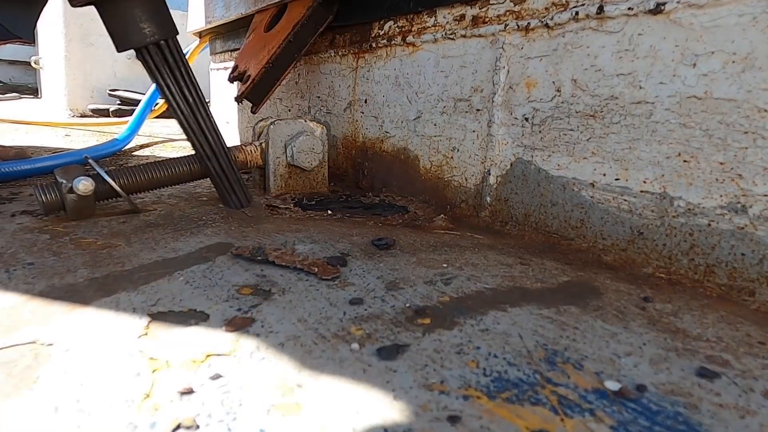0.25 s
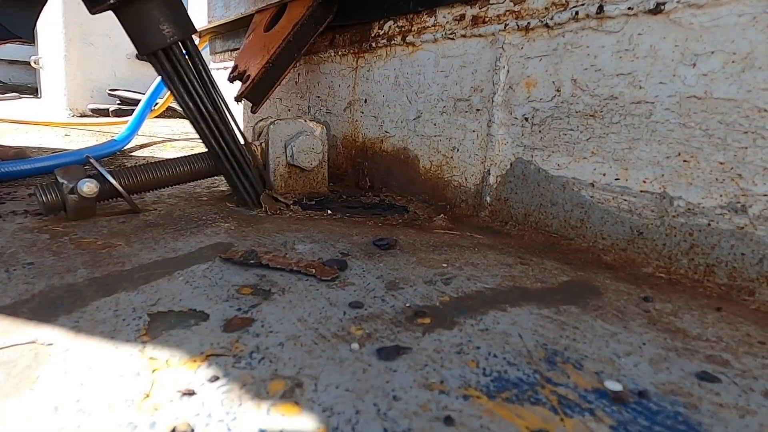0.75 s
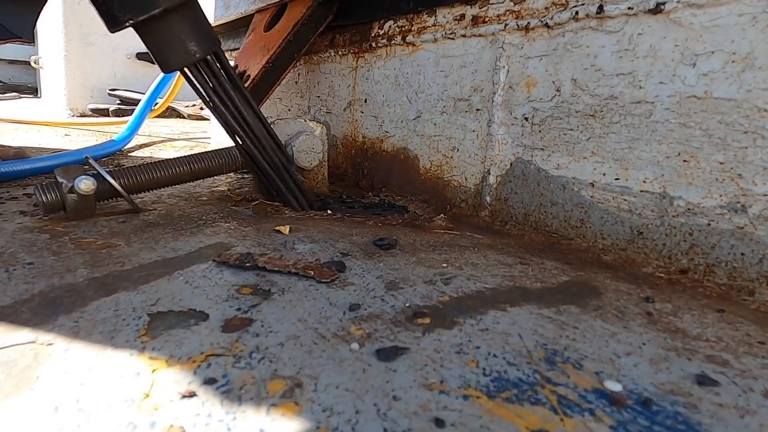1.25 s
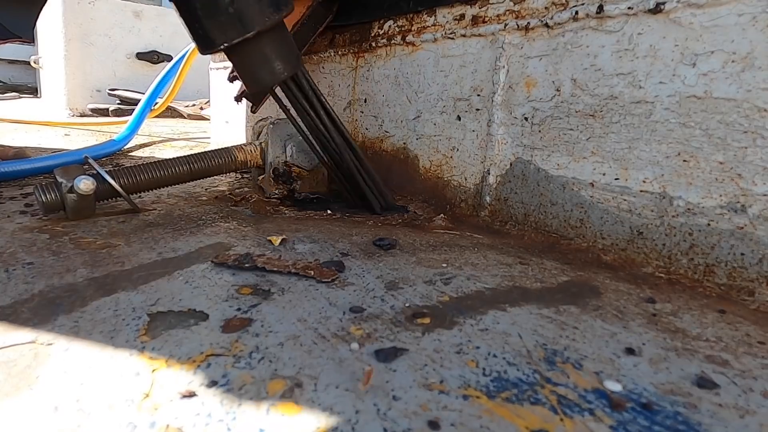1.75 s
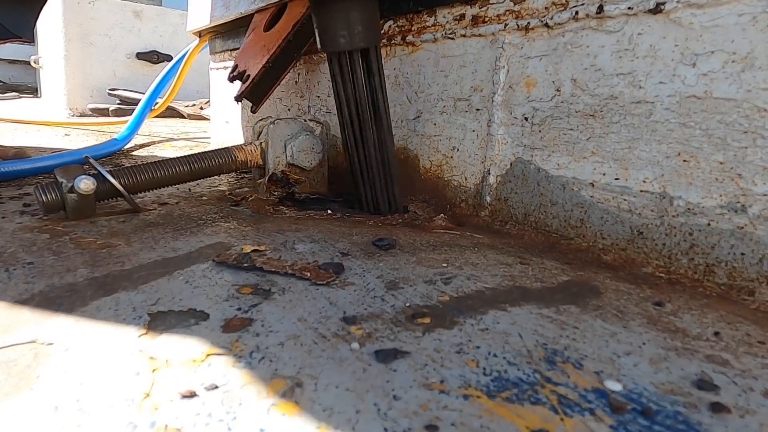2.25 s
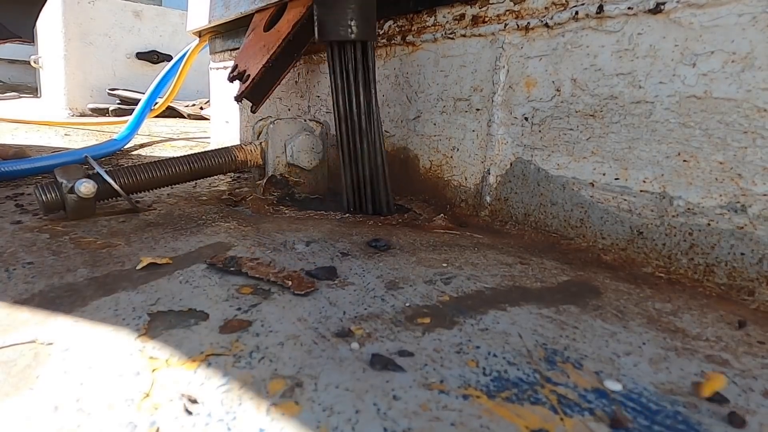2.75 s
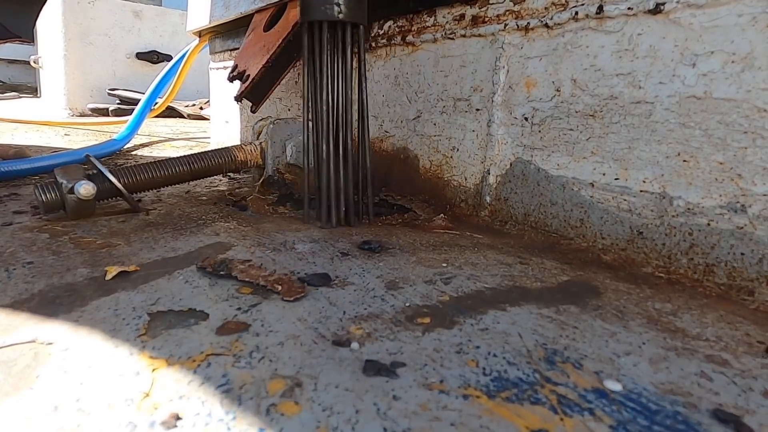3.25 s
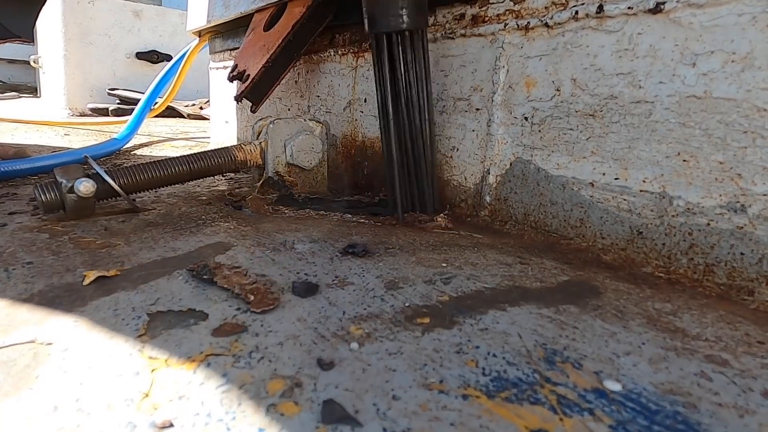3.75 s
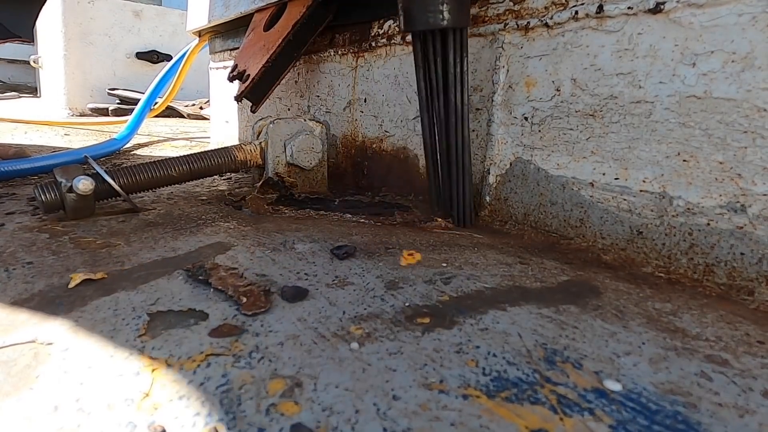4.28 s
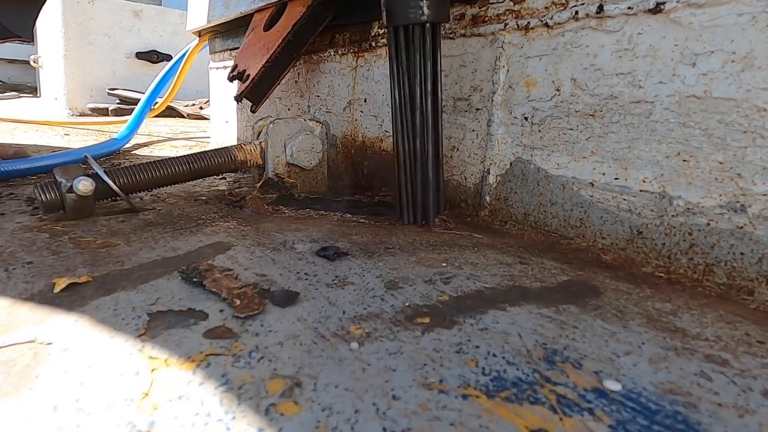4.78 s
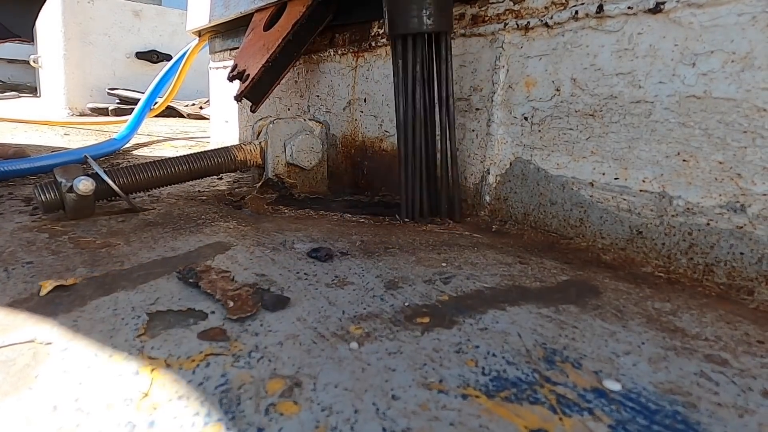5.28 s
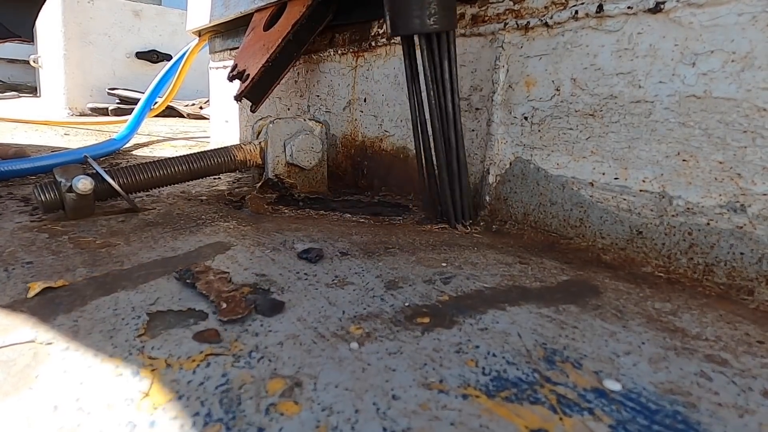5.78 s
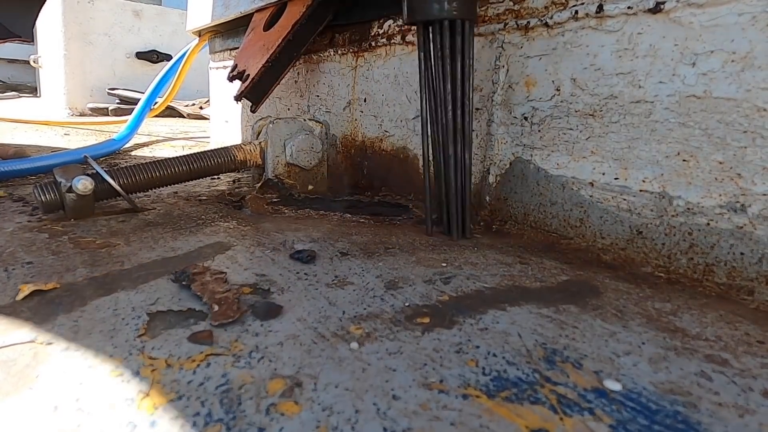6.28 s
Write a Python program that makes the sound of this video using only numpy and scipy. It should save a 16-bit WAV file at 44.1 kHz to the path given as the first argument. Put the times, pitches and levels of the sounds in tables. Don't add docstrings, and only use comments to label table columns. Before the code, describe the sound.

An air-driven needle gun rattles without pause on a rusty steel deck, about thirty-six blows a second. Each blow is a short low thump, followed by scattered needle ticks and metallic ringing. Pinging grows brighter near a bolted bracket midway, then the rattle turns duller and clankier by the bulkhead. Microphone lies very close on the plate, slightly muffled and overloaded, outdoors without audible room echo.

```python
import sys
import numpy as np
from scipy import signal
from scipy.fft import rfft, irfft
from scipy.io import wavfile
from scipy.ndimage import uniform_filter1d

SR = 44100
rng = np.random.default_rng(int(sys.argv[2]) if len(sys.argv) > 2 else 0)


def pcm_store(signal):
    levels = np.round(np.clip(np.atleast_2d(signal), -1, 1) * 32767)
    wavfile.write(sys.argv[1], SR, levels.astype(np.int16).T)


def amplitude_ratio(level_db):
    exponent = np.asarray(level_db, float) / 20
    return 10 ** exponent


N = 287752

# [t/s, strokes made so far]
PISTON_PACE = [(0.0047, 0), (0.3982, 14), (0.7873, 28), (1.1724, 42), (1.5628, 56), (1.9478, 70),
               (2.3435, 84), (2.7275, 98), (3.1046, 112), (3.5037, 127), (3.886, 141), (4.2619, 155),
               (4.6397, 169), (5.0185, 183), (5.3942, 197), (5.7696, 211), (6.1443, 225), (6.5117, 239)]
# [stroke number, time lost/ms]
SHORT_STROKES = [(8, 1.8), (25, 1.7), (29, 1.5), (33, 2.9), (44, 2.3), (46, 1.4), (54, 1.9), (63, 2.0),
                 (99, 3.2), (102, 1.4), (105, 2.1), (111, 1.8), (114, 2.0), (116, 3.1), (117, 2.4),
                 (118, 1.5), (121, 3.7), (132, 1.3), (141, 2.9), (144, 2.6), (153, 1.9), (171, 3.5),
                 (173, 1.9), (190, 2.0), (192, 3.5), (206, 2.3), (207, 2.1), (209, 2.2), (222, 3.6),
                 (235, 2.0)]
# [t/s, weight on the deck level/dB, bite on bare steel level/dB]
HAND_WORK = [(0, -19, -18.5), (.25, -21.5, -22), (.9, -17.5, -21.5), (1.3, -21.5, -21), (1.7, -21, -20),
             (2.1, -24, -27), (2.45, -20, -23), (2.75, -19.5, -23.5), (3.4, -18, -23.5), (3.65, -18.5, -25),
             (4.3, -19.5, -29.5), (4.7, -17, -24), (5.1, -19.5, -26.5), (5.8, -19, -30.5),
             (6.15, -18, -31.5), (6.52, -16.5, -22)]
# [t/s, spot (0 open deck, 1 at the bracket, 2 at the bulkhead)]
GUN_SPOT = [
    (0, 0.021),
    (1.2, 0.012),
    (1.6, 0.35),
    (2.2, 0.95),
    (2.45, 0.86),
    (3.4, 1.18),
    (3.7, 1.9),
    (4.4, 3.9),
    (5.2, 1.76),
    (6.52, 2),
]
# [t/s, half length/s, level/dB]
BARE_SKIDS = [(0.13, 0.077, 4), (0.932, 0.059, 2), (3.406, 0.029, 2), (3.955, 0.11, 5.5), (4.43, 0.01, 9),
              (4.556, 0.077, 6.5), (4.783, 0.043, 3.5), (5.298, 0.083, 7), (5.656, 0.077, 8.5),
              (5.943, 0.039, 6.5), (6.28, 0.14, 4)]
# [t/s, peak level/dB, ring f/Hz]
HARD_LANDINGS = [(3.3665, -8, 2220), (1.5345, -8.5, 2720), (1.5912, -6, 3900), (1.8642, -9, 3600),
                 (1.976, -10, 3820), (2.0892, -12, 3620), (2.2023, -13, 3790), (2.2327, -13, 3500),
                 (2.2598, -11, 3600), (2.371, -9.5, 4530), (2.401, -6, 3520), (2.454, -9, 3700),
                 (2.4818, -7, 3470), (2.5641, -11, 3380), (2.5915, -6, 3500), (2.6199, -10, 3550),
                 (2.6479, -9, 2580), (2.674, -8, 2700), (2.808, -9, 3430), (2.9435, -11, 4000),
                 (3.0783, -5, 3550), (3.1597, -10, 3580), (3.2106, -6.5, 3530), (3.2615, -6.5, 3170),
                 (3.3169, -8.5, 2280), (3.342, -8, 2720), (3.4506, -9, 4070), (5.2599, -10, 3510),
                 (5.2885, -7, 3570), (6.2806, -10, 3250)]

# [time after the blow/ms, spread/ms, level/dB]
NEEDLE_LANDINGS = [
    (-1, 0.065, 5),
    (2, 2.16, -3.5),
    (6.5, 1.2, -9.5),
    (13.5, 2.6, -5.5),
]
# [time after the blow/ms, spread/ms, level/dB]
NEEDLE_KNOCKS = [
    (1, 0.85, 0.5),
    (2, 2.7, -14),
    (9, 1.3, -5),
    (6.5, 7.9, -3.5),
]
# [time after the blow/ms, spread/ms, level/dB]
AIR_PUFFS = [
    (-.6, 1.6, -1),
    (4, 3.0, -6),
    (12.5, 4.5, 0),
]

# [f/Hz, width/Hz, level/dB on open deck, at the bracket, at the bulkhead]
STRUCK_PANELS = [(216.5, 32, -5.5, -17, -4), (260, 74, 2.5, -7.5, -25), (355.8, 39, 0.5, -5, -3),
                 (424, 59, -3, -3.5, 3.5), (551, 18, -2, -16, -19)]
# [f/Hz, width/Hz, level/dB on open deck, at the bracket, at the bulkhead]
STEEL_RINGS = [(2106, 92, 3.5, 2, 1), (2214, 28, -6.5, 2, -8), (2450, 26, -3.5, -23, -2),
               (2615, 82, -36, 7, 0.5), (2780, 140, 0.5, 4, -7), (3045, 140, 2, 4, -1.5),
               (3224, 52, -1, 0, 5), (3310, 91, -2, 7, 3.5), (3534, 62, -7, 10.5, -3),
               (3730, 140, -17, 3.5, 1.5), (3934, 94, -3.5, 5, 0), (4245, 88, -11, 4.5, -1),
               (4576, 55, -5, 0, -0.5), (4940, 170, -3.5, -4, -25)]
# [f/Hz, width/Hz, level/dB on open deck, at the bracket, at the bulkhead]
PLATE_CLANK = [(653, 250, 6, -35, -30), (805, 73, -41, 5, 2.5), (847, 18, 4.5, -1.5, -11),
               (940, 150, 0, 2.5, -4.5), (1083, 36, 6, -38, -15), (1214, 62, -49, 3, 2.5),
               (1348, 150, 5.5, 3, -27), (1480, 20, -3.5, -25, -6)]
CLANK_LEVEL = [
    -28.5,
    -28.5,
    -23,
]
# [f/Hz, width/Hz, level/dB on open deck, at the bracket, at the bulkhead]
HUMMING_PANELS = [(58.3, 5.8, -1, -3, 0.5), (88, 19, 4, 3, 3.5), (122, 57, -17, 3.5, 4),
                  (158.5, 29, -3, 2.5, 7.5), (203, 68, 0, -9.5, -5.5)]
# [f/Hz, width/Hz, level/dB on open deck, at the bracket, at the bulkhead]
VENT_WHISTLES = [
    (12995, 170, -3, 3, -2),
    (12300, 770, 2, 2, -3),
]

# [f/Hz, level/dB]
CLATTER_COLOUR = [(300, -20), (700, -3), (1800, -4.5), (3000, -12.5), (4900, -7.5), (6200, -15.5),
                  (8300, -33), (15600, -40)]
# [f/Hz, level/dB]
RUMBLE_COLOUR = [(20, -32), (33, -38), (60, -6), (160, 3.5), (330, -3), (430, -0.5), (650, -12),
                 (1200, -38)]
# [f/Hz, level/dB]
HISS_COLOUR = [(4000, -30), (6000, -6), (7500, -4.5), (9300, -3.5), (9500, 1), (9700, -2.5), (12000, -3.5),
               (15600, -11.5)]
# [f/Hz, level/dB]
EXHAUST_COLOUR = [(10300, -60), (10900, -22), (11400, -8), (12000, 2), (12500, 0.5), (13250, -2),
                  (15600, -1.5)]
# [t/s, flow level/dB]
AIR_FLOW = [(0, 0.5), (1, -0.5), (1.4, -1.5), (1.9, -2.5), (2.6, -4), (3.4, -3), (4, -0.5), (5, -0.5),
            (5.6, -2.5), (6.52, -0.5)]
# [f/Hz, level/dB]
CASE_COLOUR = [(4800, -0.5), (6000, -2.5), (7000, -3), (8500, -11.5), (15600, -22)]


def blows(wobble_ms=0.3):
    s, made = np.transpose(PISTON_PACE)
    number = np.arange(int(made[-1]) + 1)
    lost = np.zeros(len(number))
    for stroke, ms in SHORT_STROKES:
        lost[int(stroke)] = ms / 1000
    lost = np.cumsum(lost)
    at = np.interp(number, made, s + lost[made.astype(int)]) - lost
    at += wobble_ms / 1000 * rng.standard_normal(len(at))
    return np.clip((at * SR).astype(int), 0, N - 1)


def thump(at, low_hz=365, bend=0.0032, bend_ms=0.3503, centre_ms=0.34, half_ms=1.735,
          echo_ms=4.553, echo=0.34, edge=0.08):
    blow_db, struck_db = -16.5, -5
    yield_share = 0.26
    ms = np.arange(-200, 201) / SR * 1000
    turns = low_hz * ms / 1000 - bend * (np.exp(-np.maximum(ms, -2.4) / bend_ms) - 1)
    wave = np.cos(2 * np.pi * turns) + edge * np.cos(3 * 2 * np.pi * turns)
    shape = wave * np.exp(-((ms - centre_ms) / half_ms) ** 4)
    direct = signal.oaconvolve(train(at, 0.63), shape, "same")

    loop = np.zeros(int(echo_ms * SR / 1000) + 1)
    loop[[0, -1]] = 1, -echo
    echoes = signal.lfilter([1], loop, np.arange(1500) == 0)
    bounced = signal.oaconvolve(direct, echoes)[:N]
    panels = steel(STRUCK_PANELS, lambda: direct, 1.0)

    extra_weight_db = control(HAND_WORK, column=1) - np.mean(HAND_WORK, axis=0)[1]
    return amplitude_ratio(blow_db - yield_share * extra_weight_db) * evened(evened(bounced) + amplitude_ratio(struck_db) * panels)


def needles(at):
    busy = throb(at, NEEDLE_LANDINGS, -7.5, 3.1)
    shared = evened(busy * ticks(4000, 3.3))

    def strike():
        own = evened(busy * ticks(3500, 2.9))
        bundle = evened(train(late(at, 2.1, 0.5), 2.4))
        return shared + 1.42 * own + 1.55 * bundle

    return amplitude_ratio(bite() - 1.5) * steel(STEEL_RINGS, strike, 2.2)


def bite():
    t = np.arange(N) / SR
    skids = sum(db * np.exp(-((t - s) / half) ** 2) for s, half, db in BARE_SKIDS)
    return control(HAND_WORK, column=2) + skids


def pings(t60=0.044, rise_ms=0.38, crowd_db=-9, crowd_t60=0.019, low_hz=2100, high_hz=5200, lag_ms=2.46):
    out, t = np.zeros(N + 3000), np.arange(3000) / SR
    luck = rng.random((len(HARD_LANDINGS), 2, 8, 1))
    for (s, db, hz), (pitch, lag) in zip(HARD_LANDINGS, luck):
        after = np.maximum(t - lag * lag_ms / 1000, 0)
        crowd_hz = low_hz * (high_hz / low_hz) ** pitch
        crowd = amplitude_ratio(crowd_db - 60 * after / crowd_t60) * np.sin(2 * np.pi * crowd_hz * after)
        tone = amplitude_ratio(-60 * t / t60) * np.sin(2 * np.pi * hz * t) + crowd.sum(axis=0)
        rise = 1 - np.exp(-t * 1000 / rise_ms)
        out[round(s * SR):][:3000] += amplitude_ratio(db - 5.0) * rise * tone
    return out[:N]


def clank(at):
    landings = evened(ticks(3000, 2.7) * throb(at, NEEDLE_LANDINGS, -9.5, 3.4))
    front = evened(train(late(at, -1.648, 0.061), 0.8))
    strikes = landings + 1.18 * front
    spot_db = np.interp(control(GUN_SPOT, column=1), np.arange(3), CLANK_LEVEL)
    skid_db = bite() - control(HAND_WORK, column=2)
    return amplitude_ratio(spot_db + 0.1 * skid_db) * steel(PLATE_CLANK, lambda: strikes, 0.9)


def clatter(at):
    busy = throb(at, NEEDLE_KNOCKS, -5.5, 4.0)
    ring_db = bite()
    level_db = -28.5 + 0.17 * (ring_db - ring_db.mean())
    return amplitude_ratio(level_db) * coloured(ticks(9000, 0.8) * busy, CLATTER_COLOUR)


def rumble(at):
    hum = steel(HUMMING_PANELS, lambda: rng.standard_normal(N), 0.41)
    shake = coloured(rng.standard_normal(N), RUMBLE_COLOUR) + amplitude_ratio(5.0) * hum
    shake = shake / (uniform_filter1d(shake ** 2, size=2200) + 0.1) ** 0.47
    swing = throb(at, [(18, 5.5, 0)], -6, 1.2, 1.3)
    return amplitude_ratio(control(HAND_WORK, column=1)) * evened(shake * swing)


def exhaust(at):
    hiss_db, hiss_share, exhaust_db, whistle_db = -52.5, 0.35, -38, -6
    air_db = control(AIR_FLOW, column=1)
    flow = throb(at, AIR_PUFFS, -14, 2.2, 0.6)
    both = amplitude_ratio(hiss_db + hiss_share * air_db) * coloured(flow * ticks(20000, 1.2), HISS_COLOUR)
    eddies = throb(at, AIR_PUFFS, -12, 0.96, 0.44)
    whistle = steel(VENT_WHISTLES, lambda: rng.standard_normal(N), 3.7)
    vent = coloured(eddies * ticks(20000, 1.1), EXHAUST_COLOUR) + amplitude_ratio(whistle_db) * whistle
    return np.array([both, both + amplitude_ratio(exhaust_db + air_db) * vent])


def housing(x, ceiling=0.96):
    soft = ceiling * np.tanh(x / ceiling)
    return np.std(soft) * coloured(soft - soft.mean(), CASE_COLOUR)


def steel(modes, strike, wander_db):
    spot, out = control(GUN_SPOT, column=1), np.zeros(N)
    for hz, width, *spot_db in modes:
        wander = np.interp(np.linspace(0, 69, N), np.arange(70), rng.standard_normal(70))
        struck = strike() * amplitude_ratio(wander_db * wander)
        out += amplitude_ratio(np.interp(spot, np.arange(3), spot_db)) * ring(struck, hz, width)
    return evened(out)


def ring(x, hz, width):
    r = np.exp(-np.pi * width / SR)
    return evened(signal.lfilter([1], [1, -2 * r * np.cos(2 * np.pi * hz / SR), r * r], x))


def throb(at, humps, rest_db, spread_db, rise=0.54):
    ms = np.arange(-1400, 1401) / SR * 1000
    power = amplitude_ratio(2 * rest_db)
    for after, spread, db in humps:
        width = spread * np.where(ms < after, rise, 1)
        hump = amplitude_ratio(2 * db) * np.exp(-0.5 * ((ms - after) / width) ** 2)
        power = power + abs(signal.oaconvolve(train(at, spread_db) ** 2, hump, "same"))
    return np.sqrt(power)


def train(at, spread_db):
    out = np.zeros(N)
    out[at] = amplitude_ratio(spread_db * rng.standard_normal(len(at)))
    return out


def late(at, ms, scatter_ms):
    shift = (ms + scatter_ms * rng.standard_normal(len(at))) * SR / 1000
    return np.clip(at + shift.astype(int), 0, N - 1)


def ticks(per_s, size_db):
    size = amplitude_ratio(size_db * np.minimum(rng.exponential(1, N), 4))
    return size * rng.choice([-1., 1.], N) * (rng.random(N) < per_s / SR)


def coloured(x, points):
    f, db = np.transpose(points)
    hz = np.fft.rfftfreq(len(x), 1 / SR)
    return evened(irfft(rfft(x) * amplitude_ratio(np.interp(np.log(hz + 1), np.log(f), db)), len(x)))


def evened(x):
    return x / np.sqrt(np.mean(x ** 2) + 1e-20)


def control(table, column):
    table = np.array(table)
    return np.interp(np.arange(N) / SR, table[:, 0], table[:, column])


def scene():
    at = blows()
    borne = thump(at) + needles(at) + pings() + clank(at) + clatter(at) + rumble(at)
    return housing(borne) + exhaust(at)


def low_pass(x):
    return signal.sosfilt(signal.butter(12, 15690, fs=SR, output="sos"), x)


def record(dry):
    return low_pass(dry)


dry = scene()
out = record(dry)
pcm_store(out)
```